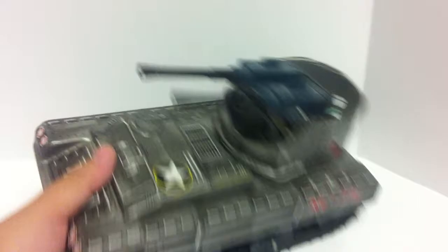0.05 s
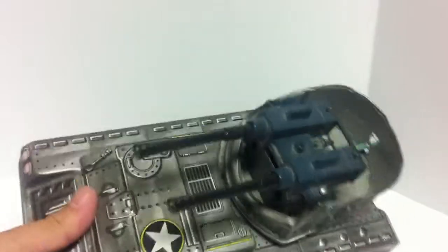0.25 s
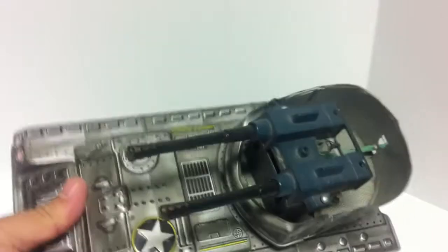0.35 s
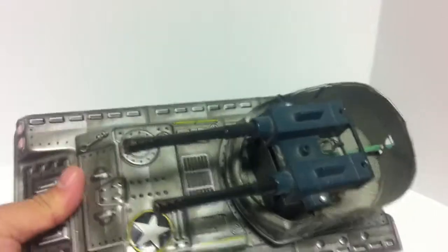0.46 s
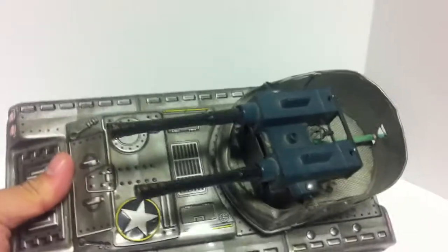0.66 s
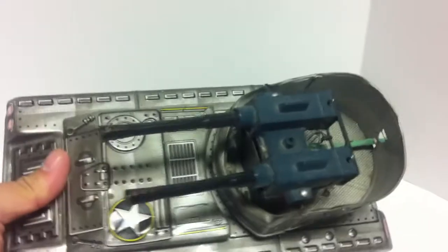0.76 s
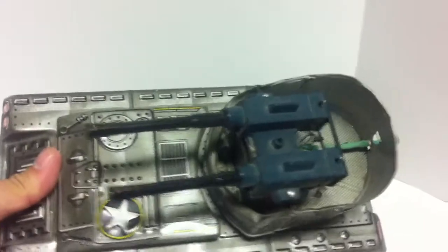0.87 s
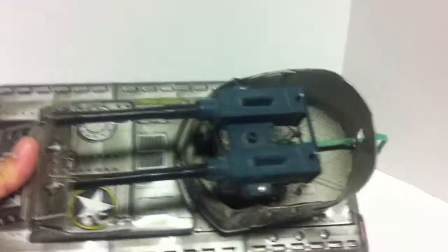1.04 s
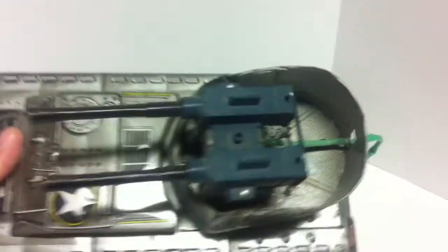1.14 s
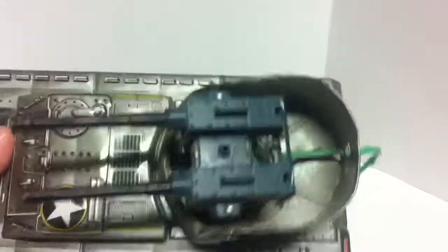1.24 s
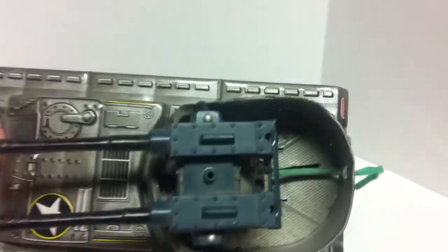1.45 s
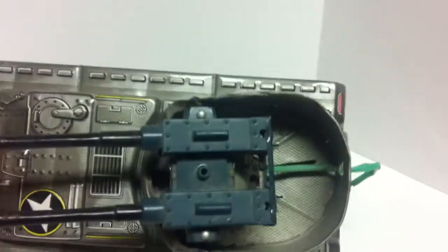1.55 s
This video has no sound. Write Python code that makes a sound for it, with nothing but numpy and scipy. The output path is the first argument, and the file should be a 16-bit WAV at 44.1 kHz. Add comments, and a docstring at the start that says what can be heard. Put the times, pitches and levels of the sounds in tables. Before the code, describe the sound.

One sharp metallic click comes early as a toy tank's loose gun mount hits its stop and bounces. Faint ticks, soft bumps and thin squeaks follow while a hand turns it, heard up close over low room hiss.

```python
"""A tin toy tank, turned over in one hand close to the microphone in a small quiet room.
As it tips, its loose gun mount falls against a stop: one sharp click and a weaker rebound.
The hollow hull bumps softly in the grip, loose parts tick and rubbing tin gives thin squeaks.
Skin slides and rustles on the shell, over a steady hiss."""
import sys
import numpy as np
from scipy import signal
from scipy.fft import rfft, irfft, next_fast_len
from scipy.io import wavfile
from scipy.ndimage import map_coordinates

SR = 44100
rng = np.random.default_rng(int(sys.argv[2]) if len(sys.argv) > 2 else 0)


def wav_record(signal):
    """Record a signal, one row per channel, as 16-bit PCM in the file named by sys.argv[1]."""
    frames = np.transpose(np.atleast_2d(signal))
    bounded = np.clip(frames, -1, 1)
    # unit amplitude maps onto the largest positive 16-bit level
    quanta = np.round(bounded * 32767).astype(np.int16)
    wavfile.write(sys.argv[1], SR, quanta)


N = 70560


def amp(db):
    """Decibels to gain."""
    return 10 ** (np.asarray(db) / 20)


def along(points, hz):
    """A curve of (freq_hz, value) points, read on a log frequency axis."""
    freqs, values = np.transpose(points)
    return np.interp(np.log(hz + 1), np.log(freqs + 1), values)


def since(start_s):
    """Seconds since start_s, zero before it."""
    return np.maximum(np.arange(N) / SR - start_s, 0)


def fade(t, t60):
    """Exponential decay, 60 dB down after t60 seconds."""
    return np.exp(-np.log(1000) * t / t60)


def swell(peak_s, rise_s, fall_s):
    """A bell-shaped rise to peak_s and fall after it."""
    t = np.arange(N) / SR - peak_s
    return np.exp(-(t / np.where(t < 0, rise_s, fall_s)) ** 2 / 2)


def ring(t, hz, t60, rise_s):
    """One mode that builds up and dies away."""
    return np.sin(2 * np.pi * hz * t) * fade(t, t60) * (1 - np.exp(-t / rise_s))


def resonance(hz, centre_hz, width_hz):
    """A peak of gain 1 at centre_hz, width_hz wide at half height."""
    return 1 / (1 + (2 * (hz - centre_hz) / width_hz) ** 2)


def filtered(x, response):
    """x through a filter whose gain is response(hz)."""
    size = next_fast_len(N + SR // 2)
    return irfft(rfft(x, size) * response(np.fft.rfftfreq(size, 1 / SR)), size)[:N]


def noise(spectrum, peaks=()):
    """Coloured noise of rms 1, with optional resonant peaks added to its spectrum."""
    def response(hz):
        boost = 1 + sum(amp(db) * resonance(hz, centre, width) for centre, width, db in peaks)
        return amp(along(spectrum, hz)) * boost
    x = filtered(rng.standard_normal(N), response)
    return x / x.std()


def tilted(spectrum, db_per_octave):
    """A spectrum with its treble tipped up or down above 1 kHz."""
    return [(hz, db + db_per_octave * np.log2(max(hz / 1000, 1))) for hz, db in spectrum]


def room_hiss():
    """The steady noise floor of the quiet room."""
    # hiss spectrum: freq_hz, density_db
    spectrum = [(20, -3), (55, -33), (90, -1.5), (130, 1), (230, -3.5), (350, 6.5), (700, -23.5),
                (1500, -5.5), (3000, -10.5), (6000, -5), (12000, -8.5), (16000, -5.5)]
    return amp(-69) * noise(spectrum)


def room_reverb(x):
    """Nearby walls return a short diffuse tail."""
    # decay of the room: freq_hz, t60_s
    decay = [(200, 0.5), (1500, 0.17), (5000, 0.19), (14000, 0.36)]
    level_db, delay_s = -13, 0.0074
    hz, t, bands = signal.stft(rng.standard_normal(SR // 2), SR, nperseg=256)
    _, tail = signal.istft(bands * fade(t, along(decay, hz)[:, None]), SR, nperseg=256)
    tail = np.pad(tail / np.linalg.norm(tail), (int(delay_s * SR), 0))
    return amp(level_db) * signal.fftconvolve(x, tail)[:N]


def hand():
    """Skin slides on the tin, bright and grainy, over the dull rustle of turning the toy."""
    # slides of skin: peak_s, level_db, rise_s, fall_s, tilt_db_per_octave
    strokes = [(.015, -60.5, 0.056, 0.02, 1.5), (.265, -63.5, 0.023, 0.028, 1),
               (.345, -64.5, 0.0065, 0.027, 2.5), (0.454, -66.5, 0.035, 0.047, 1.5),
               (.86, -67.5, .03, 0.15, 0.5), (.935, -59, 0.0061, 0.016, -0.5),
               (1.019, -60.5, 0.038, .035, 0.5), (1.1, -66.5, 0.05, 0.055, 3.5),
               (1.34, -67, 0.084, 0.074, 0)]
    # spectrum of skin on tin: freq_hz, density_db
    skin_spectrum = [(200, -40), (900, 0.5), (1700, 3.5), (3300, 1.5), (5000, 1), (7000, -3.5),
                     (12000, -5.5), (16000, -10)]
    # strength of the rustle as the hand turns: time_s, level_db
    turning = [(0, -62), (.15, -63), (.3, -64.5), (.42, -64.5), (.55, -69.5), (.78, -69), (.92, -69.5),
               (1.12, -68), (1.26, -65), (1.35, -64), (1.48, -61), (1.6, -64)]
    # rustle spectrum: freq_hz, density_db
    rustle_spectrum = [(30, -39), (80, -24), (130, 3), (210, -0.5), (350, -0.5), (800, 0), (2000, -5.5),
                       (3800, -11), (7000, -19.5), (16000, -21.5)]
    # shell resonances woken by the rubbing: centre_hz, width_hz, peak_db
    shell_peaks = [(209.5, 43, 7.5), (492, 17, -1), (781, 23, -4), (2070, 30, 3), (2507, 35, -2.5),
                   (3120, 160, -6), (3680, 300, -3.5)]
    grain_db, grains_per_s = 0.5, 120
    t = np.arange(N) / SR
    slides = sum(amp(db) * swell(peak_s, rise_s, fall_s) * noise(tilted(skin_spectrum, tilt))
                 for peak_s, db, rise_s, fall_s, tilt in strokes)
    grain = amp(grain_db * map_coordinates(rng.standard_normal(N), [t * grains_per_s]))
    rustle_db = np.interp(t, *np.transpose(turning))
    rustle = amp(rustle_db) * noise(rustle_spectrum, shell_peaks)
    return grain * (slides + rustle)


def squeaks():
    """Friction briefly feeds one resonance of the tin."""
    # thin squeaks and scrapes: peak_s, level_db, half_length_s, pitch_hz, width_hz
    rubs = [(0.014, -66.5, 0.016, 3300, 90), (.939, -66, .009, 4450, 1400),
            (0.977, -66.5, 0.013, 1603, 130), (1.394, -74, 0.013, 3800, 40)]
    out = np.zeros(N)
    for peak_s, db, half_s, pitch_hz, width_hz in rubs:
        band = filtered(rng.standard_normal(N), lambda hz: resonance(hz, pitch_hz, width_hz))
        out += amp(db) * swell(peak_s, half_s, half_s) * band / band.std()
    return out


def loose_parts():
    """Each small part ticks with one short note and a scratch."""
    # ticks: start_s, level_db, pitch_hz, scratch_db
    ticks = [(0.0367, -50, 2000, -1.5), (0.0847, -47.5, 1180, -6.5), (.152, -54.5, 842, -4),
             (0.1687, -50, 1368, 2.5), (0.192, -61, 2950, -5), (0.237, -44.5, 2580, -4),
             (0.508, -50, 1287, -12.5), (0.844, -56, 1300, -16), (1.3285, -54.5, 1850, 0.5),
             (1.407, -59, 2050, 0.5)]
    # scratch spectrum: freq_hz, density_db
    scratch_spectrum = [(100, -19), (400, 5.5), (1000, 4.5), (2200, 3), (4500, -10), (7000, -27),
                        (16000, -21)]
    t60_s = 0.046
    out = np.zeros(N)
    for start_s, db, hz, scratch_db in ticks:
        t = since(start_s)
        note = ring(t, hz, t60_s, rise_s=0.00069)
        scratch = noise(scratch_spectrum) * (t > 0) * fade(t, t60_s)
        out += amp(db) * (note + amp(scratch_db) * scratch)
    return out


def hull_bumps():
    """Soft contacts wake only the low modes of the hollow hull."""
    # bumps in the grip: start_s, level_db, pitch_hz
    bumps = [(.039, -51, 265), (0.077, -48.5, 249), (0.116, -53.5, 252), (0.153, -45, 255),
             (0.167, -46.5, 247.6), (0.254, -49.5, 252), (0.28, -48, 252), (.297, -58.5, 246.5),
             (0.499, -54.5, 252), (.511, -48, 255.5), (.56, -55, 256), (0.581, -60, 256), (0.649, -65, 261),
             (0.8453, -44.5, 265), (1.317, -58.5, 251)]
    # hull modes: pitch_ratio, level_db, t60_s
    modes = [(1, -1.5, 0.12), (.95, -12, 0.34), (1.28, -11.5, 0.044), (.55, -13.5, 0.11), (1.9, -13, 0.055)]
    low_cut_hz = 127  # the small hull radiates little below this
    ringing = sum(amp(db + mode_db) * ring(since(start_s), hz * ratio, t60, rise_s=0.0014)
                  for start_s, db, hz in bumps for ratio, mode_db, t60 in modes)
    return signal.sosfilt(signal.butter(2, low_cut_hz, 'highpass', fs=SR, output='sos'), ringing)


def gun_mount():
    """The mount hits its stop and rebounds; each contact cracks and sets it ringing."""
    # hits: start_s, level_db, ring_tilt_db_per_octave, contact_s, crack_tilt_db_per_octave
    hits = [(0.2055, -18, -2.5, 0.0024, 2.5), (0.2351, -28.5, -2.5, 0.0052, -2)]
    # modes of the mount, the main note and then roughly low to high: pitch_hz, level_db, t60_s
    modes = [(1321.4, 3.5, 0.032), (1233, -26.5, 0.1), (1365, -24, 0.051), (1560, -23, .055),
             (1783, -12, 0.044), (1973, -13, 0.04), (2090, -24.5, 0.058), (2600, -12, 0.023),
             (2810, -20, 0.031), (3077, -12.5, 0.037), (3250, -28, .04), (3827, -15, 0.031),
             (4225, -17.5, 0.049), (4555, -5.5, 0.018), (5000, -19, 0.019), (5696, -45, 0.12),
             (9900, -25, 0.031), (11450, -46, 0.024), (12860, -33, .03), (12770, -28, 0.031)]
    # spectrum of the contact's crack: freq_hz, density_db
    crack_spectrum = [(100, -32), (800, -25), (1300, -3.5), (1900, -5), (3200, -6), (4600, -3),
                      (5700, -7.5), (6500, -20.5), (7300, -8.5), (10000, -8), (13500, -6.5), (16000, -11)]
    main_hz, rise_cycles = modes[0][0], 4.54
    crack_db, crack_t60_s = -16.5, 0.026
    peak_width_hz, peak_db = 155, 9  # the crack is stronger near each mode
    peaks = [(hz, peak_width_hz, peak_db) for hz, _, _ in modes]
    out = np.zeros(N)
    for start_s, db, ring_tilt, contact_s, crack_tilt in hits:
        t = since(start_s)
        ringing = sum(amp(mode_db + ring_tilt * np.log2(hz / main_hz))
                      * ring(t, hz, t60, rise_cycles / hz) for hz, mode_db, t60 in modes)
        # the crack holds while the contact lasts, then dies away
        envelope = (t > 0) * fade(since(start_s + contact_s), crack_t60_s)
        crack = noise(tilted(crack_spectrum, crack_tilt), peaks) * envelope
        out += amp(db) * (ringing + amp(crack_db) * crack)
    return out


def scene():
    """Toy and hand close to one microphone, with the room faint behind them."""
    toy = gun_mount() + hull_bumps() + loose_parts() + squeaks()
    return (toy + room_reverb(toy) + hand() + room_hiss())[None]


def record(dry):
    """The recorder keeps nothing above its band limit."""
    top_hz = 15850
    return np.array([filtered(channel, lambda hz: hz < top_hz) for channel in dry])


dry = scene()
out = record(dry)
wav_record(out)
```